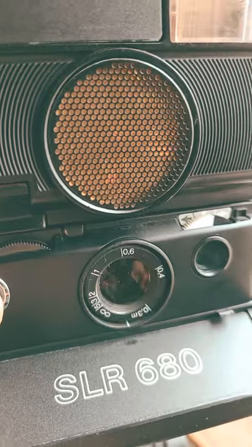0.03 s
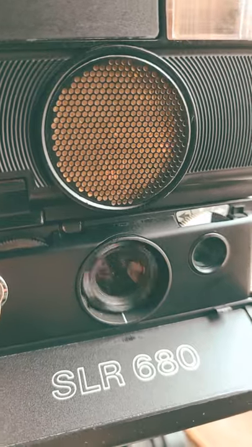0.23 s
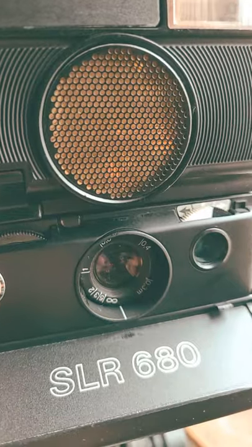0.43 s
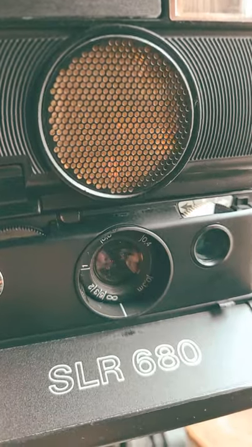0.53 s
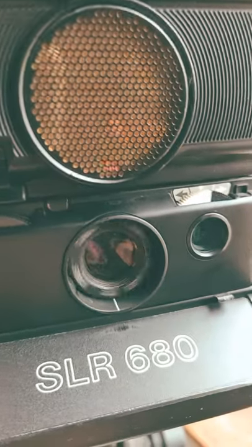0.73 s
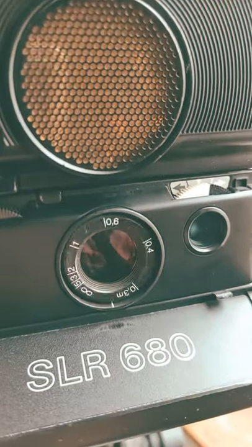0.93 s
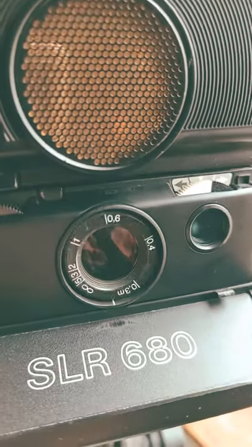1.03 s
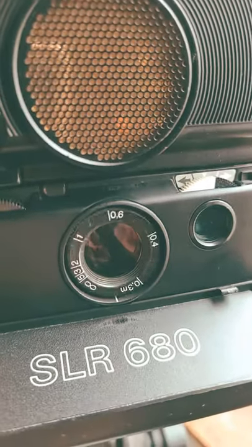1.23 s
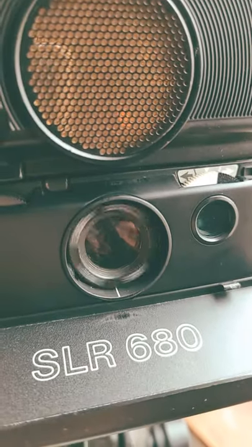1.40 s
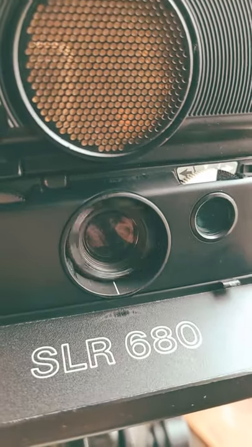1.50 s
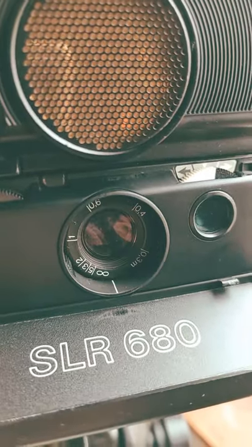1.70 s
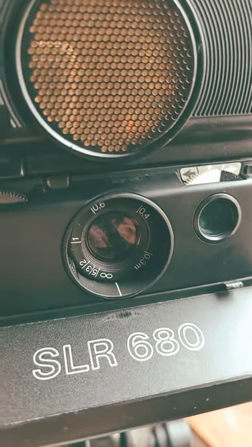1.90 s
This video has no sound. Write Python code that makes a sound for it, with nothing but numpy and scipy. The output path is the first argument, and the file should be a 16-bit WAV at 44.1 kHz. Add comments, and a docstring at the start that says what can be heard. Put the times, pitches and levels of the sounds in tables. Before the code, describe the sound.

An instant camera's focus motor whirs three times, close and slightly left. The first run starts at about 0.2 seconds, small plastic gears rattling up to a sharp click at 0.4. A slightly softer run starts near 0.75 and clicks at 1.0. The last goes from 1.4 to a click at 1.6. Each click rings briefly in a quiet room with a faint low rumble.

```python
"""The focus motor of an instant camera drives its lens out, back and out again, close to the microphones.
Each run spins up small plastic gears that rattle the housing, until the lens wheel chatters on its stop.
The camera is nearer the left microphone of a stereo pair, in a quiet room that at first still rings
from a run just before. Two soft handling bumps, a faint rumble and a low hum lie underneath."""
import sys
import numpy as np
from scipy import signal
from scipy.fft import rfft, irfft, next_fast_len
from scipy.io import wavfile
from scipy.ndimage import map_coordinates

SR = 44100
rng = np.random.default_rng(int(sys.argv[2]) if len(sys.argv) > 2 else 0)


def transcribe(u):
    """Save the signal u as a 16-bit wav file named by the first command-line argument.

    u: samples, shape (n,) or (channels, n), limited to [-1, 1]; the rate is SR.
    q: integer samples, one column per channel.
    """
    v = np.clip(np.atleast_2d(u).T, -1, 1)
    q = np.round(v * 32767).astype(np.int16)
    wavfile.write(sys.argv[1], SR, q)


N = 85995
LEAD = SR // 2  # samples before time zero, where the earlier run plays
T = np.arange(-LEAD, N) / SR
FFT = next_fast_len(len(T) + SR // 2, True) // 2 * 2
HZ = np.fft.rfftfreq(FFT, 1 / SR)
RING_SAMPLES, TAIL_SAMPLES = 4096, 16384  # housing and room responses

# room tone: (frequency [Hz], relative level [dB])
RUMBLE_COLOUR = [(20, -3), (45, -4), (60, -8.5), (95, 3.5), (140, -12), (300, -24.5), (1000, -32.5),
                 (3000, -39.5), (8000, -44.5), (15000, -46.5)]
# likeness of the room tone at the two microphones: (frequency [Hz], correlation [0-1])
RUMBLE_LIKENESS = [(60, 0.79), (130, 1), (400, .3), (3000, .1)]
# rise and fall of the low hum: (time [s], level [dB])
HUM_LEVELS = [(0.0, -52), (0.042, -55), (0.152, -90), (0.232, -59), (0.33, -76), (0.488, -58), (0.592, -62),
              (0.782, -52.5), (0.976, -53), (1.01, -49), (1.298, -59.5), (1.374, -49.5), (1.444, -50),
              (1.514, -52.5), (1.672, -51), (1.95, -64)]
# decay of the room: (frequency [Hz], t60 [s])
ROOM_DECAY = [(200, 0.39), (700, 0.26), (1200, 0.3), (2500, 0.21), (5500, 0.2), (14000, .2)]
# decay off nearby surfaces: (frequency [Hz], t60 [s])
NEAR_DECAY = [(300, 0.03), (1500, 0.063), (5000, 0.059), (14000, 0.044)]
# close sound at the microphones: (frequency [Hz], left over right [dB])
MIC_BALANCE = [(100, 5.5), (400, 4.5), (700, 8.5), (1300, 7.5), (2400, 5.5), (4400, 3), (8000, 17),
               (15000, 7.5)]
# soft handling bumps: (time [s], half-length [s], pitch [Hz], level [dB])
HANDLING_BUMPS = [(0.221, 0.022, 89.1, -53), (0.824, 0.016, 92, -45.5)]
# gear squeaks: (time [s], half-length [s], pitch [Hz], source level [dB])
GEAR_SQUEAKS = [(.441, .005, 3026, -24), (0.843, .008, 3300, -30.5), (0.904, .007, 3400, -27.5),
                (1.503, 0.015, 2455, -26.5), (1.639, 0.0064, 1750, -24)]
# resonances of the plastic housing: (frequency [Hz], width [Hz], lift [dB])
HOUSING_MODES = [(644, 38, 6.5), (1070, 70, 1), (1164, 90, 4.5), (1430, 70, -1), (1750, 210, 9.5),
                 (2420, 240, 5.5), (2980, 240, 5.5), (3310, 230, 7), (4230, 120, 2.5), (4800, 290, 4),
                 (8050, 890, -7)]
# gears taking up slack, and a bright switch tick at 0.7376 s: (time [s], source level [dB], rise [s], t60 [s],
# tilt [dB/octave])
CATCHES_AND_TICKS = [(0.186, -34, 0.0012, 0.046, -7), (.194, -32.5, 0.0015, .02, 2),
                     (0.206, -32, .002, 0.05, -0.5), (0.7376, -37.5, 0.00021, .012, 6.5),
                     (0.7455, -27.5, .001, 0.04, -3), (.791, -15.5, 0.0018, 0.042, -2),
                     (1.379, -33.5, 0.0011, 0.054, -2.5), (1.397, -29, .002, 0.027, 5)]
# force of a catch: (frequency [Hz], relative level [dB])
CATCH_SPECTRUM = [(100, -27.5), (400, -27), (750, 0), (1700, 1), (4500, 3), (7500, -10), (11000, -9),
                  (15000, -11.5)]
# blows on the stop: (time [s], source energy [dB], tilt [dB/octave], bounce gap [s], bounce loss [dB])
STOP_BLOWS = [(-.13, 9, -1, 0.0021, 1.5), (.4275, 6.5, -1.26, .0014, 2), (.4372, 3.5, -2, .0016, 2.5),
              (.9897, 10, 0.25, 0.0009, 0), (1.6194, 8, -1, 0.0018, 0.7), (1.629, -0.5, -3, 0.0025, 2.5)]
# force of a blow: (frequency [Hz], relative level [dB])
STOP_SPECTRUM = [(60, -28), (250, -24), (500, -16), (800, -3.5), (1150, 0.5), (1900, -3), (3100, -2),
                 (5000, -2.5), (7500, -12), (11000, -18.5), (15000, -18.5)]
# force of the running gears: (frequency [Hz], relative level [dB])
GEAR_SPECTRUM = [(60, -38), (200, -26.5), (350, -12), (520, -15), (700, -4.5), (1100, 0), (2000, -0.5),
                 (3300, -4), (4900, -2.5), (5800, -10), (7200, -19.5), (8100, -21.5), (9500, -22.5),
                 (15000, -26.5)]
# shaft tones: (multiple [of shaft rate], relative level [dB])
SHAFT_TONES = [(1, -2), (2, -6), (3, 2.5), (4, -0.5)]
# groan while the motor accelerates: (multiple [of shaft rate], relative level [dB])
GROAN_TONES = [(4, -5.5), (5, -2)]
# rough whines of the meshing teeth: (multiple [of shaft rate], level over the rattle [dB])
MESH_WHINES = [(29, -14.5), (45, -8.5)]
# runs, at the source: (start [s], stop [s], rattle [dB], tilt [dB/octave], shaft tone [dB], groan [dB])
MOTOR_RUNS = [(-.37, -0.135, -28, 7, -76, -45), (0.185, 0.436, -27, 0.26, -60.5, -45.5),
              (0.742, 0.985, -31.5, -0.7, -55, -60.5), (1.377, 1.621, -26.5, 0, -58, -47)]

RUMBLE_DB, HUM_HZ = -61.5, 37.3
ROOM_DB, ROOM_SIDE_DB = -4, 1.5  # room tail, raised on the left and lowered on the right
NEAR_DB, LEFT_LEAD_S = -4.5, 0.000258  # nearby reflections; head start at the left microphone
STOP_NEAR_DB = -1.5  # the stop radiates more directly than the enclosed gears
CRUNCH_T60_S, CRUNCH_DB = 0.009, 4.5  # crunch against the spike of a contact
BOUNCE_SCATTER, BOUNCE_TILT_DB = 0.13, -0.56  # share of a gap; tilt per octave added each bounce
SHAFT_HZ = 115.5  # top speed
SPIN_UP_S, SWELL_S, COAST_S = 0.066, 0.028, 0.008  # time constants: speed, rattle's rise, final fade
TEETH, TOOTH_SCATTER, TOOTH_SPREAD_DB = 11, 0.17, 4.5  # knocks a turn, scatter in time [gaps] and size
SLIDE_DB, START_DB = 1, -13  # sliding against knocking; rattle at the start against full level
TURN_DEPTH, WAVER_DB = 0.095, 0.32  # the rattle swings once a turn and wavers at random
WHINE_WANDER_RAD, WHINE_WANDER_HZ = 1.8, 696.3


def amp(db):
    """Decibels to gain."""
    return 10 ** (np.asarray(db) / 20)


def unit(x):
    """Scaled to rms 1."""
    return x / np.sqrt(np.mean(x ** 2) + 1e-20)


def along(points, hz=HZ):
    """Joins (frequency, value) points along a log axis."""
    f, values = np.transpose(points)
    return np.interp(np.log(hz + 1), np.log(f), values)


def filtered(x, response):
    """x through a frequency response."""
    return irfft(rfft(x, FFT) * response, FFT)[..., :x.shape[-1]]


def wobble(rate):
    """A smooth random curve, rate knots a second."""
    coarse = T[::SR // 1000]
    knots = rng.standard_normal(SR // 40)
    return np.interp(T, coarse, map_coordinates(knots, [(coarse - T[0]) * rate], mode="mirror"))


def noise():
    """White noise of rms 1."""
    return rng.standard_normal(len(T))


def room_tone():
    """The quiet room: a wavering hum and a rumble whose bass is much alike at both microphones."""
    spread = np.arccos(np.clip(along(RUMBLE_LIKENESS), -1, 1)) / 2
    colour = amp(along(RUMBLE_COLOUR)) * [np.cos(spread), np.sin(spread)]
    mid, side = filtered(np.array([noise(), noise()]), colour)
    hum_rms = amp(np.interp(T, *np.transpose(HUM_LEVELS)))
    hum = np.sqrt(2) * hum_rms * np.sin(2 * np.pi * HUM_HZ * T + 0.4 * wobble(7.4))
    return amp(RUMBLE_DB) * unit(np.array([mid + side, mid - side])) + hum


def reflections(t60s):
    """Response of a diffuse tail at each microphone, every frequency dying at its own speed."""
    hz, t, spectra = signal.stft(rng.standard_normal((2, TAIL_SAMPLES)), SR, nperseg=256)
    tail = signal.istft(spectra * amp(-60 * t / along(t60s, hz)[:, None]), SR, nperseg=256)[1]
    tail /= np.linalg.norm(tail, axis=1, keepdims=True)
    delayed = np.pad(tail, ((0, 0), (SR // 700, 0)))
    return rfft(delayed, TAIL_SAMPLES)


def at_microphones(x, near_db):
    """Close sound reaches the left microphone first and louder; nearby surfaces and the room answer."""
    hz = np.fft.rfftfreq(TAIL_SAMPLES, 1 / SR)
    sides = np.array([[0.5], [-0.5]])  # left, right: each takes half of a difference
    direct = np.exp(2j * np.pi * hz * LEFT_LEAD_S * sides)
    close = (direct + amp(near_db) * reflections(NEAR_DECAY)) * amp(along(MIC_BALANCE, hz) * sides)
    room = amp(ROOM_DB + ROOM_SIDE_DB * sides) * reflections(ROOM_DECAY)
    margin = SR // 200  # holds the early arrival on the left
    path = np.roll(irfft(close + room), margin, axis=1)
    return signal.fftconvolve(x[None], path, axes=1)[:, margin:][:, :len(T)]


def squeak_or_bump(time, half_length, hz, level_db):
    """One resonance swells and fades: a gear squeak or, low down, a handling bump."""
    swell = amp(level_db) * np.exp(-((T - time) / half_length) ** 2)
    return swell * np.sin(2 * np.pi * hz * T + 0.5 * wobble(220))


def housing(force, colour, tilt_db):
    """A force with its own colour rings the plastic housing, at unit power gain."""
    f = np.fft.rfftfreq(RING_SAMPLES, 1 / SR)
    db = along(colour, f) + tilt_db * np.log2(np.maximum(f, 500) / 2000)
    db += sum(lift / (1 + (2 * (f - hz) / width) ** 2) for hz, width, lift in HOUSING_MODES)
    # minimum phase, so the ringing follows the force
    cepstrum = irfft(np.log(unit(amp(db))))
    cepstrum[1:RING_SAMPLES // 2] *= 2
    cepstrum[RING_SAMPLES // 2 + 1:] = 0
    ring = irfft(np.exp(rfft(cepstrum)))
    return signal.oaconvolve(force, ring)[:len(T)]


def catch_or_tick(time, level_db, rise, t60, tilt_db):
    """A brief bright scrape as the gears engage, or a switch tick, ringing the housing."""
    age = np.maximum(T - time, 0)
    envelope = (1 - np.exp(-age / rise)) * amp(level_db - 60 * age / t60)
    return housing(noise() * envelope, CATCH_SPECTRUM, tilt_db)


def end_stop(time, energy_db, tilt_db, gap, loss_db, contacts=4):
    """The lens wheel chatters on its stop, each contact a spike and a crunch, duller than the last."""
    clack = np.zeros(len(T))
    age = np.arange(RING_SAMPLES) / SR
    spike = age == 0
    for k in range(contacts):
        crunch = rng.standard_normal(RING_SAMPLES) * amp(-60 * age / CRUNCH_T60_S)
        spectrum = rfft(amp(CRUNCH_DB) * crunch / np.linalg.norm(crunch) + spike)
        white_force = irfft(spectrum / np.abs(spectrum))[:RING_SAMPLES // 2]
        contact = housing(white_force, STOP_SPECTRUM, tilt_db + BOUNCE_TILT_DB * (k - 1))
        onset = time + gap * (k + BOUNCE_SCATTER * np.sqrt(k) * rng.standard_normal())
        clack[LEAD + round(onset * SR):][:len(contact)] += amp(-k * loss_db) * contact
    return amp(energy_db) * clack / np.linalg.norm(clack)


def gear_teeth(turns):
    """Force of teeth that knock unevenly and slide, swinging in strength once a turn."""
    tooth = np.arange(SR // 50)
    timing, size = rng.standard_normal((len(tooth), 2)).T
    onsets = np.interp((tooth + TOOTH_SCATTER * timing) / TEETH, turns, np.arange(len(T))).astype(int)
    knocks = np.bincount(onsets, unit(amp(TOOTH_SPREAD_DB * size)), len(T))
    knocks *= np.sqrt(SR / (TEETH * SHAFT_HZ))  # rms near 1 at top speed
    swing = (1 + TURN_DEPTH * np.sin(2 * np.pi * turns)) * amp(WAVER_DB * wobble(70))
    sliding = amp(SLIDE_DB) * noise()
    return (knocks + sliding) / np.hypot(1, amp(SLIDE_DB)) * swing


def shaft_tones(turns, orders):
    """Tones locked to whole multiples of the shaft's rotation."""
    return sum(amp(db) * np.sin(2 * np.pi * (k * turns + rng.random())) for k, db in orders)


def focus_motor(start, stop, rattle_db, tilt_db, tone_db, groan_db):
    """The shaft spins up, groaning under load; the gears rattle faster and louder until the stop."""
    age = np.maximum(T - start, 0)
    speed = 1 - np.exp(-age / SPIN_UP_S)
    running = (T > start) * np.exp(-np.maximum(T - stop, 0) / COAST_S)
    turns = np.cumsum(SHAFT_HZ * speed) / SR
    swell = amp(rattle_db + START_DB * np.exp(-age / SWELL_S))
    rattle = housing(gear_teeth(turns) * running * swell, GEAR_SPECTRUM, tilt_db)
    drone = amp(tone_db) * speed ** 2 * shaft_tones(turns, SHAFT_TONES)
    load = speed ** 4 * (1 - speed)
    groan = amp(groan_db) * load / load.max() * shaft_tones(turns, GROAN_TONES)
    whine = np.zeros(len(T))
    for multiple, db in MESH_WHINES:
        wander = WHINE_WANDER_RAD * wobble(WHINE_WANDER_HZ)
        whine += amp(rattle_db + db) * np.sin(2 * np.pi * multiple * turns + wander)
    return rattle + (drone + groan + whine * speed) * running


def scene():
    """The camera at close range, left of centre, over the tone of the quiet room."""
    catches = sum(catch_or_tick(*row) for row in CATCHES_AND_TICKS)
    squeaks = sum(squeak_or_bump(*row) for row in GEAR_SQUEAKS)
    runs = sum(at_microphones(focus_motor(*row), NEAR_DB) for row in MOTOR_RUNS)
    gear_noises = at_microphones(catches + squeaks, NEAR_DB)
    stops = sum(at_microphones(end_stop(*row), NEAR_DB + STOP_NEAR_DB) for row in STOP_BLOWS)
    bumps = sum(squeak_or_bump(*row) for row in HANDLING_BUMPS)
    return (room_tone() + bumps + gear_noises + stops + runs)[:, LEAD:]


def record(dry):
    """The recorder cuts off steeply above 15.5 kHz."""
    return filtered(dry, 1 / (1 + (HZ / 15500) ** 120))


dry = scene()
out = record(dry)
transcribe(out)
```